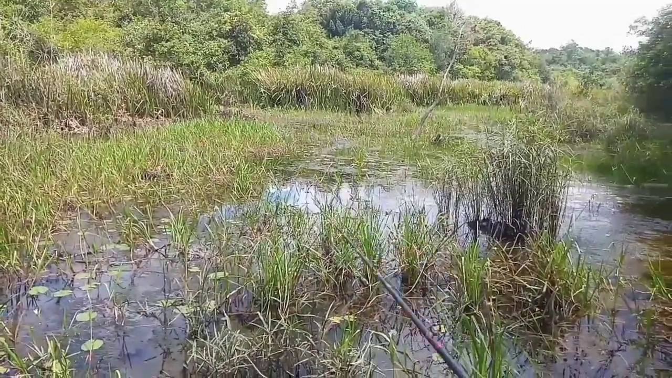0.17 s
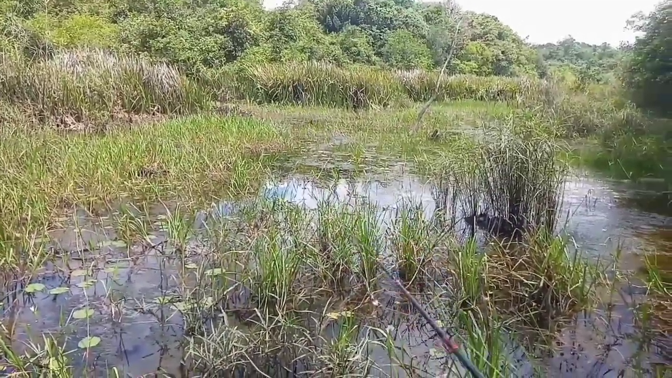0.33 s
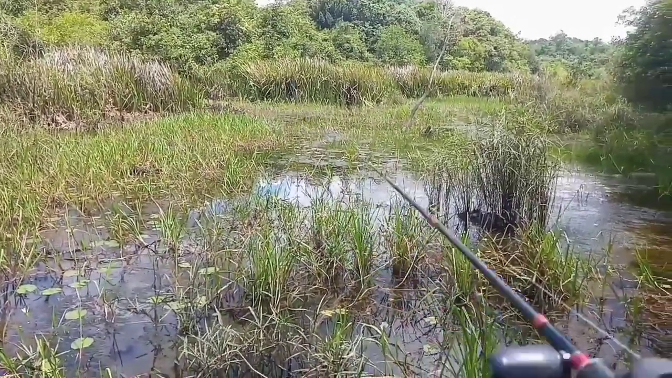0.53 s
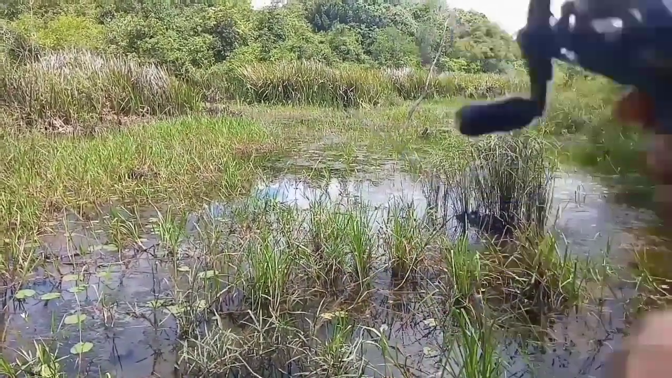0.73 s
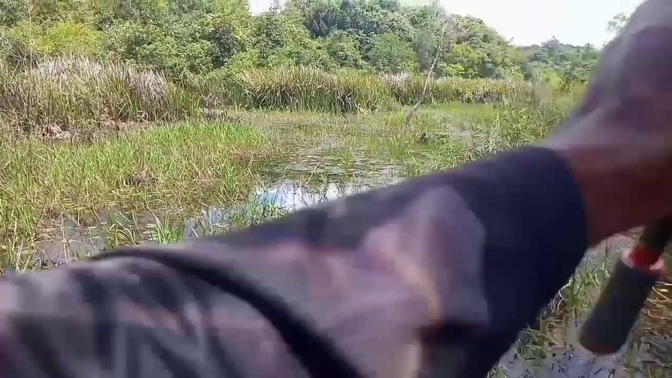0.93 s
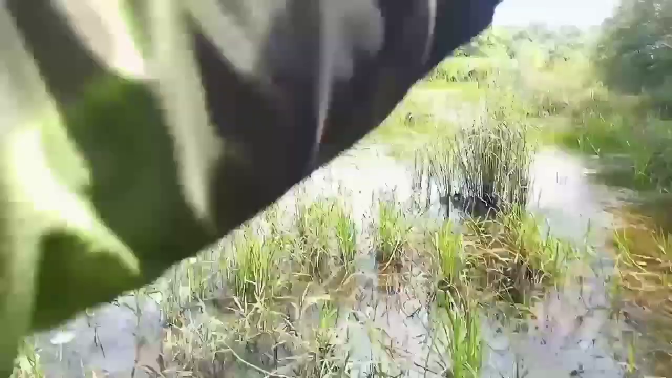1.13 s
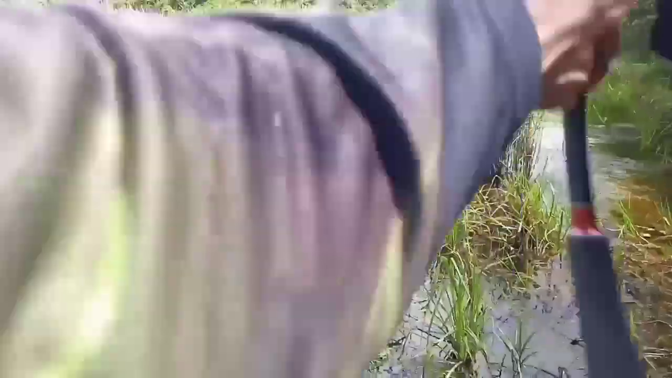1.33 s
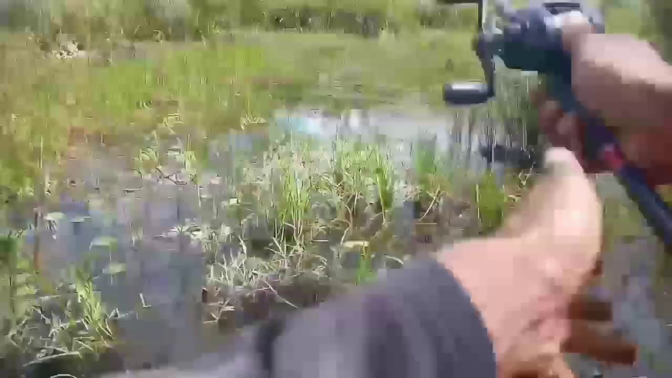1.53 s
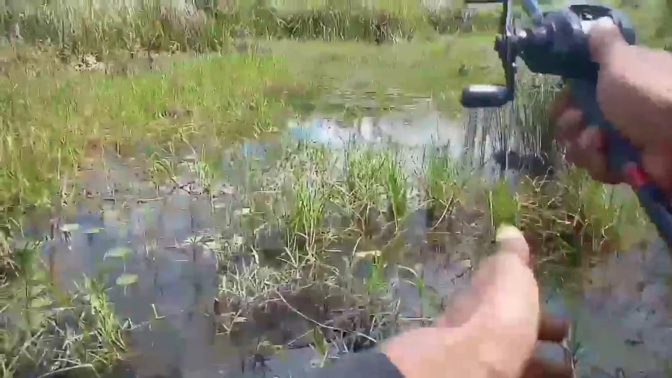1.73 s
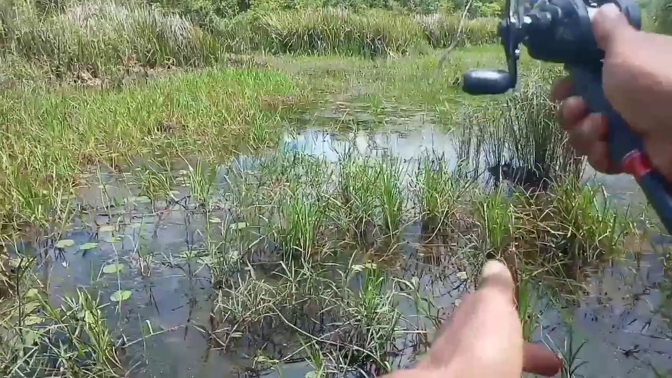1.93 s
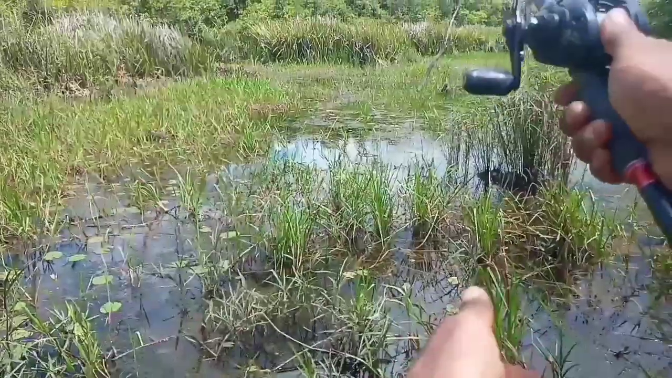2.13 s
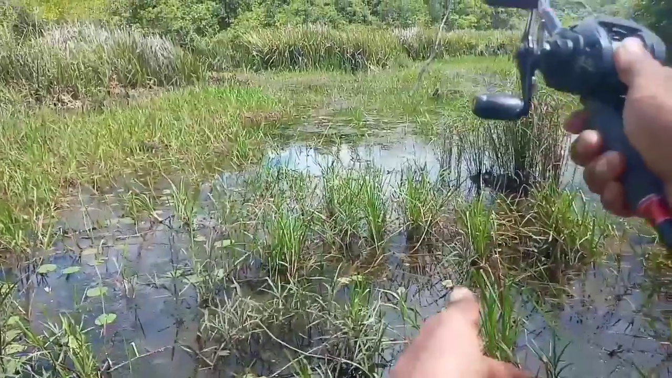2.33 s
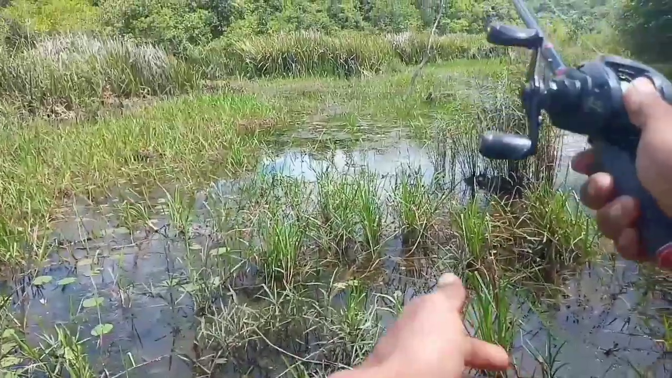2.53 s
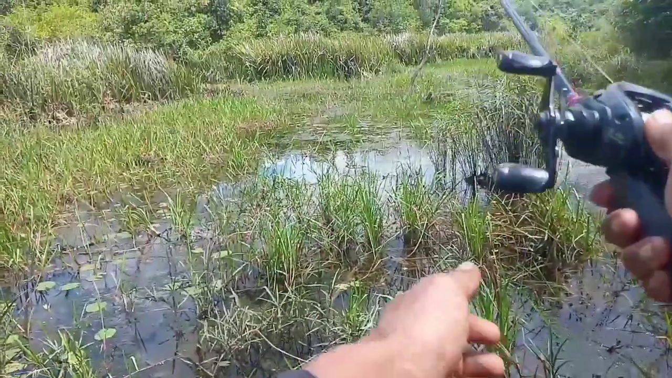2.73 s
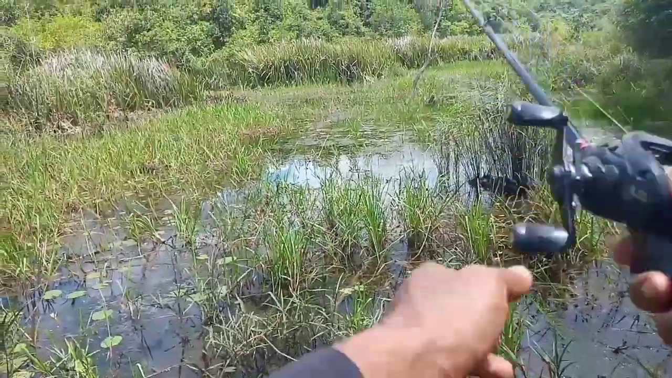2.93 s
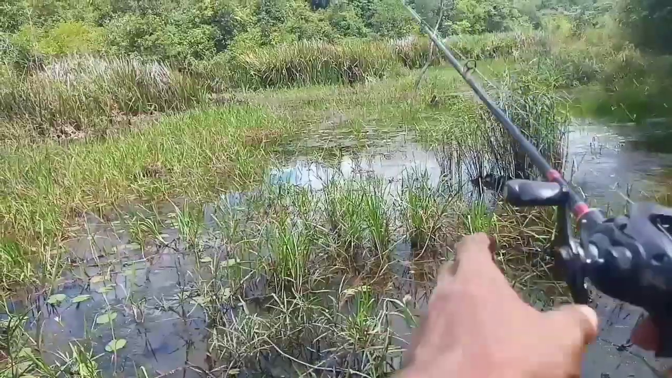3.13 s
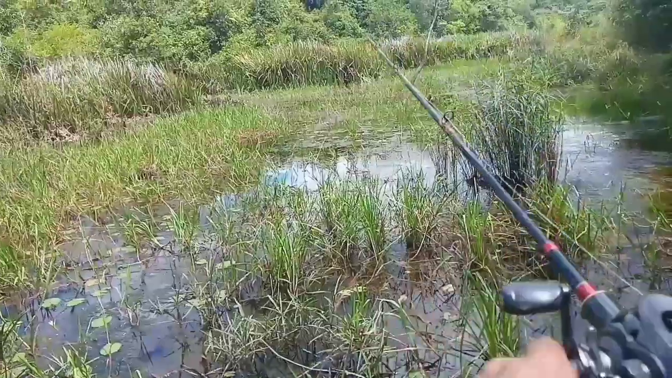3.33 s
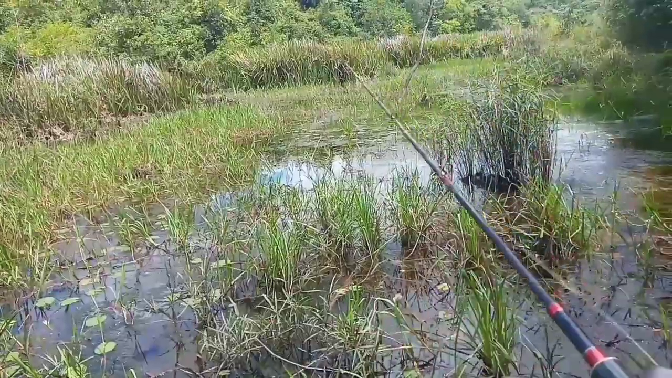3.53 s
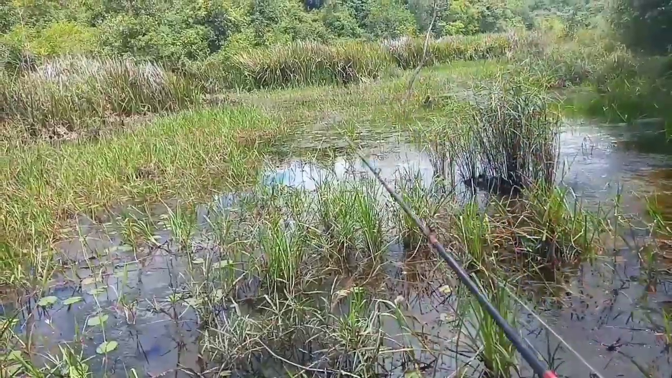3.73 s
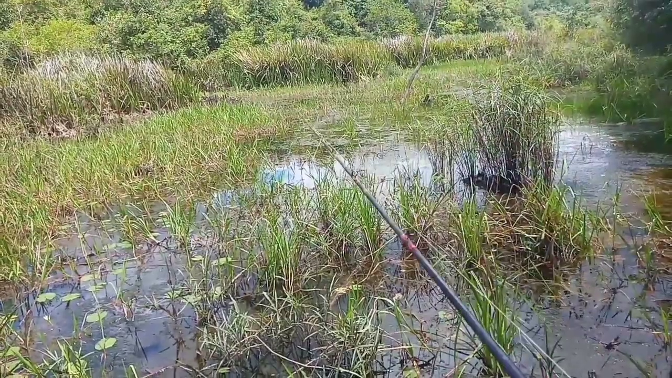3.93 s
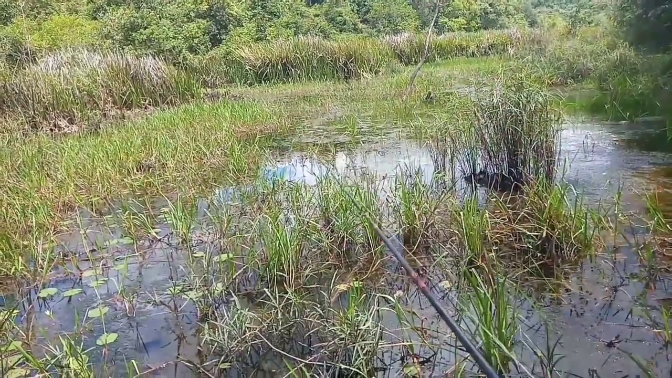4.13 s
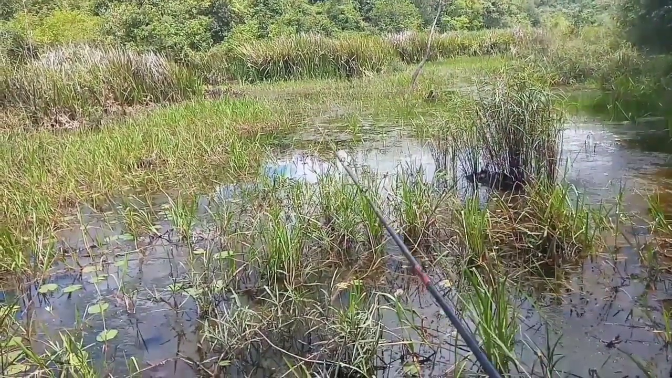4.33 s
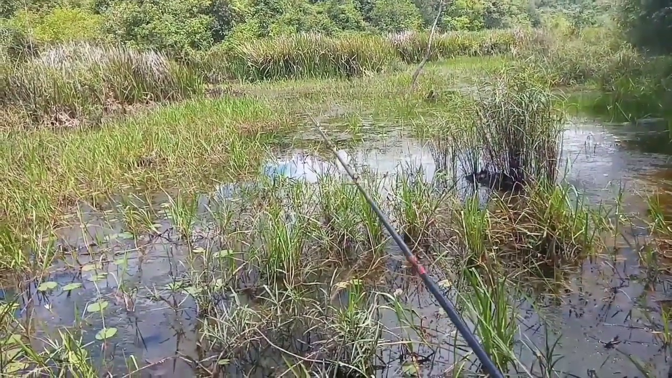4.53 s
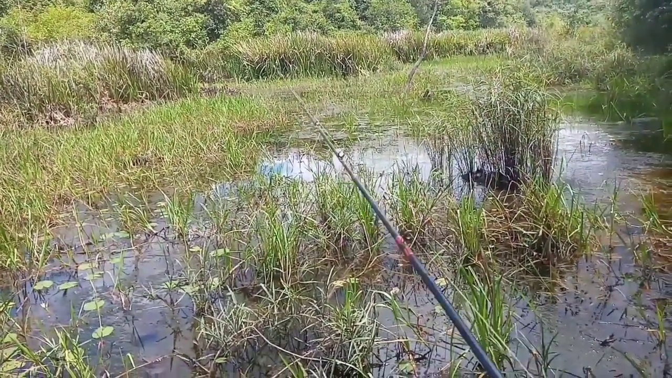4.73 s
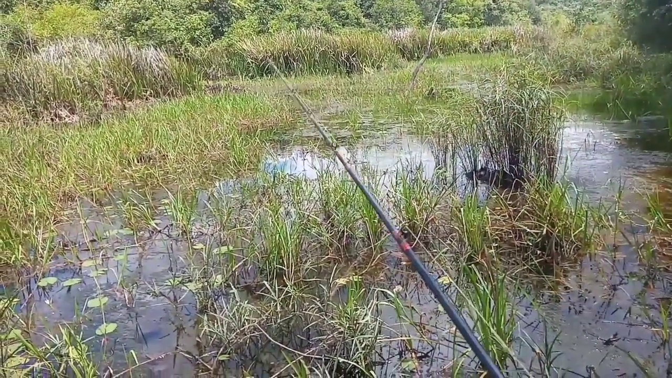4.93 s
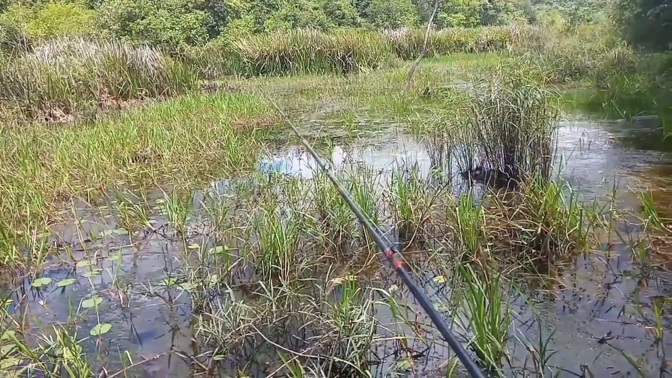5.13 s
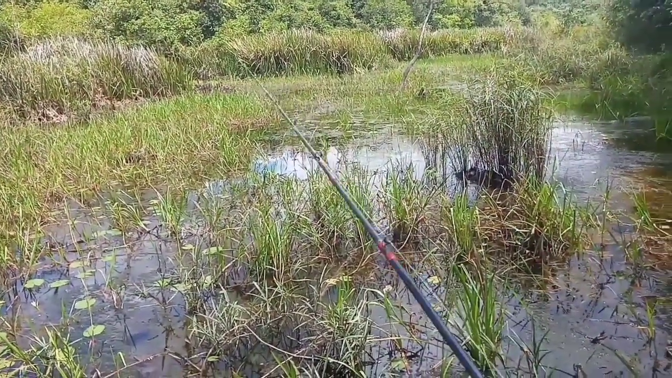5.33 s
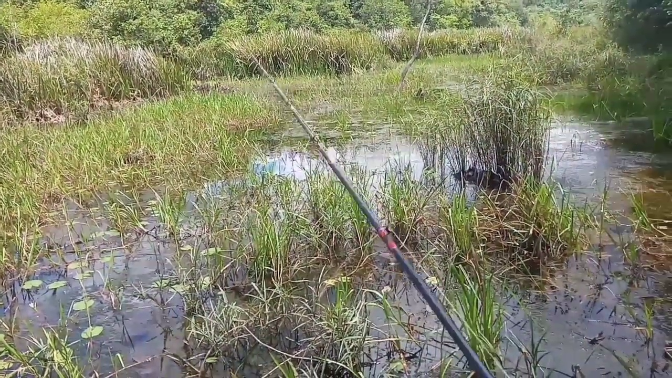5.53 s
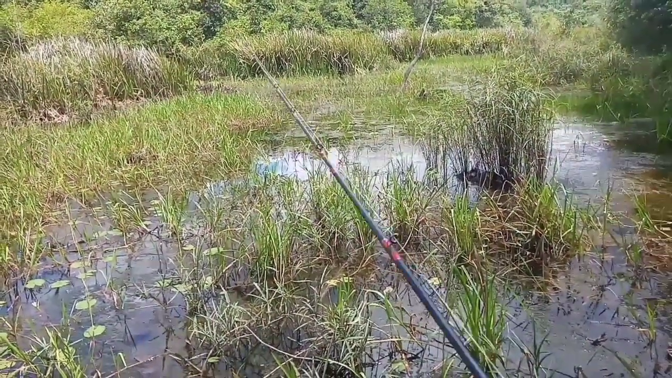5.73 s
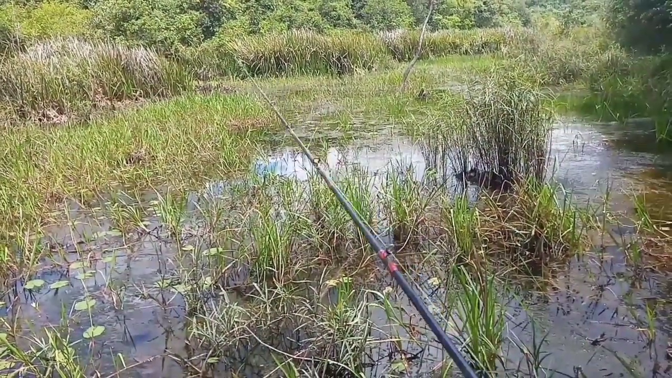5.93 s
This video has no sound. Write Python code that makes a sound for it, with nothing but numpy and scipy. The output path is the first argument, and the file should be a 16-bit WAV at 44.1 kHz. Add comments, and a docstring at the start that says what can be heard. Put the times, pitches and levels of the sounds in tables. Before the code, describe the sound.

Hard metallic click, sleeve rustle, fast whipping cast, a falling spool whir stopped by a thumb, then a bright double-edged clack and faint gear ticks outdoors.

```python
"""A clutch snaps open, a rod swishes, and a casting reel's free spool whirs and slows until a thumb stops it.
The handle then snaps the clutch shut and winds in with faint gear ticks. Sleeves rustle, wind breathes
on the microphone, and insects sing far off at the edge of a marsh. Knocks ring metal modes, the spool adds
multiples of its turning rate to shaped noise, and cloth, air and wind are shaped noise. Small drifts vary them."""
import sys
import numpy as np
from scipy import signal
from scipy.fft import rfft, irfft, next_fast_len
from scipy.io import wavfile
from scipy.ndimage import uniform_filter1d

SR = 44100
rng = np.random.default_rng(int(sys.argv[2]) if len(sys.argv) > 2 else 0)


def store_wav(level_fs):
    """Save 16-bit WAV to argv[1]."""
    pcm = np.round(np.clip(np.atleast_2d(level_fs), -1, 1) * 32767)
    wavfile.write(sys.argv[1], SR, pcm.T.astype(np.int16))


N = 268569
T = np.arange(N) / SR   # time in seconds

# In all tables levels are relative, and a half length runs from the peak of a swell to 1/e of its height.
# Wind on the microphone. Each row: time in seconds, level in dB.
WIND_LEVEL = [(0.0, -80.5), (0.27, -79.5), (0.93, -72.5), (1.75, -69), (1.88, -74), (2.22, -77.5),
              (2.73, -78.5), (2.85, -69), (2.97, -78.5), (3.21, -75), (4.24, -77.5), (5.39, -75.5),
              (5.78, -80), (6.09, -73.5)]
# Tone of the wind. Each row: frequency in Hz, level in dB per Hz.
WIND_TONE = [(15, -46.5), (25, -15), (49, 3.5), (97, -2.5), (135, -2), (270, -12.5), (600, -19), (780, -42)]
# Tone of the still air. Each row: frequency in Hz, level in dB per Hz.
AIR_TONE = [(150, -37), (250, -5.5), (460, -6.5), (1380, -7.5), (3280, -7), (4490, -11.5), (5160, -31.5),
            (8400, -17), (10000, -23), (14900, -30), (15600, -32)]
AIR_DB = -75.5
CRICKETS_HZ, CRICKETS_WIDTH_HZ, CRICKETS_DB = 8400, 500, -91
# A far cicada. Each row: time in seconds, pulses per second.
CICADA_PULSES = [(4.45, 328.5), (5.1, 321), (5.5, 315.5), (6.09, 311)]
# The cicada's body picks out multiples of its pulse rate. Each row: frequency in Hz, level in dB.
CICADA_BODY = [(3400, -100), (3730, -71), (3900, -67), (4060, -68.5), (4150, -79), (4400, -77),
               (4600, -79.5), (5000, -84), (6000, -160)]
CICADA_SWELL_S = 0.1
SECOND_RATE, SECOND_DB = 1.085, -5   # a second cicada, faster and farther
# A low drone. Each row: time in seconds, pitch in Hz, level in dB.
DRONE = [(0, 320, -70), (.1, 343, -79.5), (.18, 312, -69), (.22, 315, -100)]

# Rustle of sleeves and hands. Each row: time in seconds, level in dB.
RUSTLE_LEVEL = [(0.0, -69), (0.352, -76.5), (0.46, -52), (0.592, -68.5), (0.708, -58.5), (0.786, -66.5),
                (0.95, -62), (1.19, -62.5), (1.33, -57), (1.44, -53), (3.0, -65), (3.14, -68),
                (3.246, -73.5), (3.536, -68.5), (3.62, -71), (3.72, -55), (3.91, -69.5), (4.15, -63.5),
                (4.4, -70), (4.62, -63.5), (4.82, -67.5), (4.92, -69.5), (5.01, -63), (5.19, -78),
                (5.31, -68), (5.58, -69.5), (5.9, -70.5), (6.09, -63.5)]
# Tone of the cloth. Each row: frequency in Hz, level in dB per Hz.
RUSTLE_TONE = [(710, -29), (1200, -14.5), (1660, -7), (2530, -4), (3300, 0), (4210, -7.5), (5450, -26),
               (7000, -29.5), (9100, -62)]
# Gear resonances. Each row: centre in Hz, width in Hz, level in dB.
GEARS = [(1167.4, 170, -8), (1390, 170, -5), (1610, 240, -2), (2900, 150, -4.5), (3300, 400, -3.5)]
GEARS_WAVER_DB = 3.8
MURMUR_DB = -12   # steady gear murmur against the rustle
# Short pushes make the gears murmur louder. Each row: peak in seconds, half length in seconds, level in dB.
PUSHES = [(0.016, 0.035, -62), (0.16, 0.06, -73.5), (1.262, 0.037, -60.5), (1.358, 0.061, -61),
          (3.187, 0.02, -68), (3.628, 0.05, -68), (3.734, 0.039, -67), (3.857, 0.024, -63),
          (4.15, 0.11, -69.5), (4.64, 0.033, -63), (4.833, 0.036, -64.5), (5.103, 0.047, -71),
          (5.304, 0.054, -66), (5.703, 0.066, -78.5)]
# Gear teeth ticking. Each row: time in seconds, level in dB.
TICK_LEVEL = [(0, -93), (3.6, -83), (4.5, -69.5), (5.0, -78.5), (6.09, -79.5)]
# Cloth and line brush past. Each row: peak in seconds, half length in seconds, lowest Hz, highest Hz, level in dB.
BRUSHES = [(0.694, 0.04, 6400, 15500, -83), (4.18, 0.029, 5300, 12000, -75.5),
           (2.934, 0.094, 3950, 4350, -66)]
# A thin whine as the handle turns. Each row: peak in seconds, half length in seconds, level in dB.
WHINES = [(.17, 0.11, -72), (3.601, .04, -74.5), (3.887, .055, -73.5)]
WHINE_HZ, WHINE_WIDTH_HZ = 1220, 52

# Rod and line cut the air. Each row: time in seconds, then the rush, low rush and high rush in dB.
SWISH = [(1.41, -57, -86, -72), (1.44, -42.5, -95, -77), (1.48, -30.5, -60, -55.5),
         (1.515, -24.5, -61, -50), (1.535, -32, -53, -67), (1.556, -57, -49, -92), (1.66, -45, -61.5, -81)]
# Tone of the main rush. Each row: frequency in Hz, level in dB per Hz.
RUSH_TONE = [(400, -18), (800, -12), (1200, -2.5), (2600, -0.5), (3600, -9), (4800, -21), (6000, -54.5)]
# Tone of the high rush. Each row: frequency in Hz, level in dB per Hz.
HIGH_RUSH_TONE = [(3500, -33), (5500, -4), (8300, 2), (9500, -9.5), (12000, -16), (15000, -12),
                  (16500, -19)]
# Rough whistles of the whipping line. Each row: peak in seconds, half length in seconds, pitch in Hz, level in dB.
WHISTLES = [(1.482, 0.0045, 2320, -26), (1.493, 0.0049, 2300, -43), (1.509, 0.003, 1450, -22),
            (1.518, 0.0042, 2820, -32), (1.519, 0.01, 1546, -25.5)]
WHISTLE_FLUTTER_DB, WHISTLE_RISE_S = 3, 0.0005

# The free spool slows. Each row: time in seconds, turns per second.
SPIN = [(1.56, 291), (1.68, 267.4), (1.85, 238.4), (2.18, 166), (2.31, 146.5), (2.63, 101), (3.0, 62)]
# How the frame passes the hum. Each row: frequency in Hz, level in dB.
FRAME = [(250, -33), (450, -11.5), (640, 4.5), (750, 2), (900, -2.5), (1150, -4), (1700, -0.5), (2550, -5),
         (3500, -4), (5000, -15)]
# Low resonances that the first three multiples sweep through. Each row: frequency in Hz, level in dB.
WOBBLE = [(140, -22), (164, -18), (185, -41), (235, -12), (290, -23), (370, -10.5), (450, -22),
          (490, -14.5), (550, -12.5), (730, -0.5), (805, -3), (840, -16)]
# Tone of the bearing noise. Each row: frequency in Hz, level in dB per Hz.
WHIR_TONE = [(910, -45.5), (1550, -8), (1710, -3.5), (2250, -3.5), (3910, -4), (6030, -28), (8160, -18.5),
             (9500, -28), (12400, -52)]
# Tone of the line's hiss. Each row: frequency in Hz, level in dB per Hz.
LINE_TONE = [(3240, -29), (5500, -37), (6070, -5.5), (8260, -14), (10000, -6.5), (13000, 2), (15000, 0),
             (15600, 6)]
# Line pays out in surges and once slackens. Each row: peak in seconds, half length in seconds,
# then the lift of hum, whir and hiss in dB.
SURGES = [(1.685, 0.028, 0, -0.5, 10), (1.766, 0.055, 4.5, 4, 10.5), (2.167, 0.057, 4.5, 2.5, 8),
          (2.33, 0.075, -4, -1, 0), (2.54, 0.086, -3, 2, 9.5), (2.862, 0.12, 9, 3, 7.5)]
# The thumb drags on the spool. Each row: time in seconds, resonance in Hz, level in dB.
BRAKE = [(2.79, 850, -90), (2.82, 695, -73), (2.865, 600, -60.5), (2.92, 480, -68), (2.98, 296, -74),
         (3.0, 280, -82)]
FREE_S, THUMB_S, STOP_S = 1.53, 2.612, 3.0   # spool let go, thumb feathers it, thumb stops it
HUM_DB, HUM_FALL_DB_PER_S, THUMB_DAMPS_DB = -47.5, 11, 44
WHIR_DB, WHIR_FALL_DB_PER_S, STOP_DB_PER_S = -46.5, 11, 76
HISS_DB, HISS_PAUSE_S, HISS_PAUSE_DB = -82.5, 0.16, 17   # the hiss pauses at the thumb's first touch
HUM_WAVERS_DB, HUM_FLUTTERS_DB, HUM_BLUR_RAD = 4.2, 2.5, 0.5   # each multiple on its own
ROUGH_FROM_S, ROUGH_DB = 2.226, 4   # slowing down, the spool runs unevenly and its multiples break up
WOBBLE_FADES_DB = 30   # the wobble dies once the spool runs unevenly

# Contacts in the reel's clutch and frame. Each row: time in seconds, peak in dB, strongest ring in Hz,
# fall-off in dB per octave, crack in dB, thud in dB, rise in milliseconds, share of the ring's length.
CONTACTS = [(0.4012, -11.5, 1060, 45.5, -65, -50.5, 3.3, 0.5),
            (0.402, -38, 3715, 24.5, -45.5, -45, 1.5, 0.92), (0.403, -42, 1680, 44.5, -49.5, -45, 2, 2),
            (0.4385, -37.5, 3400, 19.5, -45.5, -44.5, 1.5, 1.2),
            (0.445, -16.5, 3470, 13.5, -29, -37.5, 0.25, 0.48),
            (0.4466, -1.5, 3500, 1, -21, -16, 0.065, 0.39),
            (0.4479, -8.5, 1640, 14, -32.5, -20.5, 0.39, 0.45),
            (0.4506, -20, 2730, 50, -38.5, -36, 2.2, 1.1), (0.4563, -20, 1150, 8, -38, -22.5, 1.5, 0.86),
            (1.278, -21.5, 2900, 6, -27.5, -41, 0.087, 0.13), (2.581, -43, 3400, 13, -12, -45, .3, .7),
            (3.149, -35.5, 1480, 57, -40.5, -36, 1.03, 2.2), (3.159, -40.5, 1470, 45, -42, -42, 1.2, 3),
            (3.621, -41, 2950, 23, -35, -47, 2.2, 1.2), (3.6436, -18, 3000, 25, -22, -42, .8, .6),
            (3.645, -7, 2308, 4, -29.5, -43.5, .5, .35), (3.6619, -17, 3030, 35, -37.5, -48, 1.5, 1),
            (3.664, -15.5, 2000, 16.5, -41, -51.5, .6, .55), (3.671, -3, 2139, 23, -19.5, -36.5, .2, 1.1),
            (3.6721, 1, 3030, 40, -34, -28.5, 0.6, 1.2), (3.6745, -0.5, 2597, 10, -31, -28.5, 0.29, 0.48),
            (3.677, -21, 2960, 18.5, -31.5, -18, .9, 0.76), (3.681, -26, 1900, 44.5, -35.5, -31.5, 1.5, 3),
            (3.841, -32.5, 2990, 39, -27.5, -50.5, 0.52, 0.78),
            (4.0733, -42, 3100, 32, -37.5, -46.5, 1.1, .8), (4.128, -39.5, 3140, 40, -37, -35, 1.3, 0.81)]
# Ringing modes of the reel. Each row: frequency in Hz, level in dB, time to fall 60 dB in seconds.
REEL_MODES = [(1090, -24, 0.034), (1460, -9.5, 0.0088), (1679, -0.5, 0.016), (1880, -5.5, 0.023),
              (2160, -0.5, 0.009), (2625, -0.5, 0.019), (3090, 2.5, 0.011), (3400, -2, 0.016),
              (3900, -8, 0.0044)]
# Modes of small steel parts. Each row: frequency in Hz, level in dB, time to fall 60 dB in seconds.
STEEL_MODES = [(6150, -14, 0.002), (6870, -10, 0.012), (8100, -6, 0.0029)]
# Modes of the rod grip. Each row: frequency in Hz, level in dB, time to fall 60 dB in seconds.
GRIP_MODES = [(107.9, -19, 0.051), (200, -6, 0.02), (370, -7.5, 0.017), (610, 0.5, 0.0057),
              (795, 1, 0.0086), (940, -5.5, 0.02)]

# The sound cuts out briefly. The pair: start in seconds, end in seconds.
DROPOUT = (5.7955, 5.8298)
CUTOFF_HZ = 16700
TOP = 1.1   # loud peaks are rounded towards this height


def amp(db):
    """dB to gain."""
    return 10 ** (np.asarray(db) / 20)


def unit(x):
    """Scale to an rms (average strength) of 1."""
    return x / np.sqrt(np.mean(x ** 2) + 1e-20)


def curve(rows):
    """Columns of a table over time, then a gate that is open inside its span."""
    s, *columns = np.transpose(rows)
    inside = 1.0 * (T >= s[0]) * (T <= s[-1])
    gate = uniform_filter1d(inside, size=400, mode="nearest")
    return [np.interp(T, s, column) for column in columns] + [gate]


def at_hz(points, hz):
    """Read a spectrum on a log-frequency axis, at -80 dB outside its ends."""
    table_hz, table_db = np.transpose(points)
    return np.interp(np.log(hz + 1e-9), np.log(table_hz), table_db, left=-80, right=-80)


def drift(rate):
    """Random wandering with rms 1; a higher rate in Hz wanders faster."""
    r = np.exp(-80 * np.pi * rate / SR)   # worked out on every 40th sample
    slow = signal.lfilter([1], [1, -2 * r, r * r], rng.standard_normal(N // 40 + 2002))[2000:]
    return np.interp(np.arange(N) / 40, np.arange(len(slow)), unit(slow))


def step(s, width):
    """Straight rise from 0 to 1 that starts at s."""
    return np.clip((T - s) / width, 0, 1)


def bell(s, half):
    """A smooth swell of height 1."""
    return np.exp(-((T - s) / half) ** 2)


def colour(x, spectrum):
    """Shape a dense noise by a spectrum; rms 1."""
    size = next_fast_len(N)
    gain = amp(at_hz(spectrum, np.fft.rfftfreq(size, 1 / SR)))
    return unit(irfft(rfft(x, size) * gain, size)[:N])


def band(x, low_hz, high_hz):
    """Keep the sound between two frequencies."""
    return signal.sosfilt(signal.butter(2, [low_hz, high_hz], "band", fs=SR, output="sos"), x + 1e-18)


def ring(x, hz, t60):
    """A unit click sets ringing a sine that starts near height 1 and falls 60 dB in t60 seconds."""
    r, w = amp(-60 / (t60 * SR)), 2 * np.pi * hz / SR
    return signal.lfilter([0, np.sin(w)], [1, -2 * r * np.cos(w), r * r], x + 1e-18)


def grains(per_s, spread_db):
    """Random clicks of uneven size."""
    clicks = rng.random(N) < per_s / SR
    size_db = spread_db * np.minimum(rng.exponential(1, N), 4)
    return clicks * rng.choice([-1, 1], N) * amp(size_db)


def patchy(x, patch_db, from_hz=350, count=17):
    """Quarter-octave bands of a noise swell and sink on their own."""
    edges = from_hz * 2 ** (np.arange(count) / 4)
    out = x
    for low, high in zip(edges, edges[1:]):
        swell = amp(patch_db * drift(10.0) - patch_db)
        out = out + (swell - 1) * band(x, low, high)
    return out


def free_run():
    """Open from the release until the spool has stopped."""
    return step(FREE_S, 0.0099) - step(STOP_S + 0.072, 0.038)


def cicadas():
    """Two pulse trains at nearby rates, heard as the multiples that the body picks out."""
    pulses = curve(CICADA_PULSES)[0] * (1 + 0.001547 * drift(9.3))
    cycles = 2 * np.pi * np.cumsum(pulses) / SR
    out = np.zeros(N)
    for rate, db in [(1, 0), (SECOND_RATE, SECOND_DB)]:
        for k in range(11, 16):
            level_db = at_hz(CICADA_BODY, k * rate * pulses) + db - 5 + 4.5 * drift(12)
            out += amp(level_db) * np.sin(k * rate * cycles + 1.1 * drift(20))
    return step(CICADA_PULSES[0][0], CICADA_SWELL_S) * out


def marsh():
    """Shaped noise for wind, still air and crickets, with two cicadas and an unsteady low drone."""
    wind = amp(curve(WIND_LEVEL)[0] + 2.5 + 2.8 * drift(5.6)) * colour(rng.standard_normal(N), WIND_TONE)
    air = amp(AIR_DB) * patchy(colour(rng.standard_normal(N), AIR_TONE), patch_db=4.5)
    half = CRICKETS_WIDTH_HZ / 2
    crickets = unit(band(rng.standard_normal(N), CRICKETS_HZ - half, CRICKETS_HZ + half))
    crickets *= amp(CRICKETS_DB + 1.2 * drift(6.5))
    hz, drone_db, near = curve(DRONE)
    drone = np.sin(2 * np.pi * np.cumsum(hz * (1 + 0.058 * drift(34))) / SR)
    return wind + air + crickets + cicadas() + near * amp(drone_db + 4.5) * drone


def handling():
    """Cloth rustle, a murmur in gear resonances, a whine and clumps of short tooth ticks."""
    rustle_db, _ = curve(RUSTLE_LEVEL)
    busy = 1 - free_run()   # the hands rest while the spool runs free
    cloth = colour(rng.standard_normal(N) + 0.54 * grains(1500, 4.2), RUSTLE_TONE) * amp(0.89 * drift(14))
    cloth = patchy(cloth, patch_db=6.0, from_hz=840, count=12)

    murmur = amp(rustle_db + MURMUR_DB) + sum(amp(db) * bell(s, half) for s, half, db in PUSHES)
    gear = np.zeros(N)
    for hz, width, db in GEARS:
        hum = unit(band(rng.standard_normal(N), hz - width / 2, hz + width / 2))
        gear += amp(db + GEARS_WAVER_DB * drift(9)) * hum

    teeth = grains(250 * amp(4.2 * drift(5.5)), 2.4)
    tick = unit(ring(teeth, 2950, 0.02) - ring(teeth, 3350, 0.01))
    brushes = np.zeros(N)
    for s, half, low, high, db in BRUSHES:
        brushes += amp(db) * bell(s, half) * unit(band(rng.standard_normal(N), low, high))
    whine = unit(ring(rng.standard_normal(N), WHINE_HZ, 1.7 / WHINE_WIDTH_HZ))
    whine *= sum(amp(db) * bell(s, half) for s, half, db in WHINES)
    hands = busy * (amp(rustle_db - 4.0) * cloth + amp(-6.5) * murmur * gear)
    return hands + amp(curve(TICK_LEVEL)[0]) * tick + brushes + whine


def swish():
    """Eddies behind the rod make a broad rush; the whipping line whistles in short rough bursts."""
    rush_db, low_db, high_db, on = curve(SWISH)
    white = rng.standard_normal(N)
    rush = amp(rush_db - 8) * colour(white + 1.7 * grains(3600, 1.3), RUSH_TONE)
    low_rush = amp(low_db) * unit(band(white, 70, 720))
    high_rush = amp(high_db) * colour(white + 0.5 * grains(400, 9.0), HIGH_RUSH_TONE)
    out = on * (rush + low_rush + high_rush)
    for s, half, hz, db in WHISTLES:
        swell = np.where(T < s, bell(s, WHISTLE_RISE_S), bell(s, half))
        tone = np.sin(2 * np.pi * hz * T + 0.5 * drift(49))
        out += amp(db + WHISTLE_FLUTTER_DB * drift(180)) * swell * tone
    return out


def cast_levels():
    """Hum, whir and line hiss in dB: hum and whir sink with time; all surge with the line and yield to the thumb."""
    lift = sum(np.outer(lifts_db, bell(s, half)) for s, half, *lifts_db in SURGES)
    since = T - FREE_S
    stop = STOP_DB_PER_S * np.maximum(T - STOP_S, 0)
    pause = step(THUMB_S, 0.049) - step(THUMB_S + HISS_PAUSE_S, 0.044)
    hum = HUM_DB - HUM_FALL_DB_PER_S * since + lift[0] - THUMB_DAMPS_DB * step(THUMB_S - 0.03, 0.15)
    whir = WHIR_DB - WHIR_FALL_DB_PER_S * since + lift[1] - stop
    hiss = HISS_DB + lift[2] - HISS_PAUSE_DB * pause - 2 * stop
    return hum, whir, hiss


def spool_tones(turns, phase, hum_db, centre):
    """Multiples of the turning rate: a hum coloured by the frame, and a drag around the thumb's resonance."""
    part = slice(int(1.4 * SR), int(3.2 * SR))   # only while the spool is heard
    hum, drag = np.zeros(N), np.zeros(N)
    for k in range(1, 29):
        hz = k * turns[part]
        blur = min(k / 4, 1) * HUM_BLUR_RAD * drift(35) * (1 + step(ROUGH_FROM_S, 0.22))
        wave = np.sin(k * phase[part] + rng.uniform(0, 2 * np.pi) + blur[part])
        rough_db = ROUGH_DB * step(ROUGH_FROM_S, 0.44) * (drift(25) - 0.5)
        waver_db = HUM_WAVERS_DB * drift(8.5) + HUM_FLUTTERS_DB * drift(30) + rough_db
        waver = amp(waver_db[part] - 0.17 * max(k - 14, 0))   # high multiples are weaker
        if k < 4:
            wobble_db = (hum_db - WOBBLE_FADES_DB * step(ROUGH_FROM_S, 0.097))[part]
            level = waver ** 0.83 * amp(wobble_db + 1.0 + at_hz(WOBBLE, hz))
        else:
            level = waver * amp(hum_db[part] - 8.0 + at_hz(FRAME, hz))
        hum[part] += wave * level
        drag[part] += wave * waver ** 0.8 * amp(-35 * np.log2(hz / centre[part]) ** 2)
    return hum, drag


def spool():
    """A wobble and one bump a turn make multiples; the bearing noise throbs with the turn until the thumb."""
    turns, _ = curve(SPIN)
    hum_db, whir_db, line_db = cast_levels()
    centre, brake_db, thumb = curve(BRAKE)
    phase = 2 * np.pi * np.cumsum(turns * (1 + 0.00591 * drift(25.8))) / SR
    hum, drag = spool_tones(turns, phase, hum_db, centre)

    throb = 1 + 0.5 * np.cos(phase) * (T < THUMB_S)
    each_turn = np.diff(phase // (2 * np.pi), prepend=0)
    bumps = unit(each_turn * amp(1.5 * drift(60)))
    bumps *= 1 - step(ROUGH_FROM_S, THUMB_S - ROUGH_FROM_S)   # they fade as the spool runs unevenly
    whir = colour(throb * rng.standard_normal(N) + 2.5 * grains(2300, 3.0) + bumps, WHIR_TONE)
    whir *= amp(0.55 * drift(21))
    rumble = unit(band(throb * rng.standard_normal(N), 630, 2700))
    line = colour(throb * rng.standard_normal(N) + bumps, LINE_TONE)
    line = unit(patchy(line, patch_db=5, from_hz=5000, count=7))
    noise = amp(whir_db - 1.5) * whir + amp(hum_db - 9.0) * rumble + amp(line_db + 1.0) * line
    return free_run() * (hum + noise) + thumb * amp(brake_db - 5.5) * drag


def strike(s, db, pitch_hz, fall_db, rise_ms, share, chance):
    """One contact: every mode swells over the rise time and dies; those nearest its pitch are favoured."""
    hz, gain_db, t60 = np.transpose(REEL_MODES)[:, :, None]
    t = np.arange(int(0.06 * SR)) / SR
    swell = np.sin(np.pi / 2 * np.clip(1000 * t / max(rise_ms, 0.02), 0, 1)) ** 2
    start_db = db + gain_db - 8.0 - fall_db * abs(np.log2(hz / pitch_hz)) + chance[:, None]
    level_db = start_db - 60 * np.maximum(t - rise_ms / 1000, 0) / (t60 * share)
    out, at = np.zeros(N), round(s * SR)
    out[at:at + len(t)] = swell * np.sum(amp(level_db) * np.sin(2 * np.pi * hz * t), axis=0)
    return out


def contacts():
    """Each contact rings the reel's modes, with a crack, a thud in the grip and a short scatter."""
    s, db, pitch, fall, crack_db, thud_db, rise, share = np.transpose(CONTACTS)
    at = np.round(s * SR).astype(int)
    chance = rng.normal(0, 1.2, (len(s), len(REEL_MODES)))   # dB for each mode of each contact

    def train(level_db):
        """One click per contact."""
        return np.bincount(at, amp(level_db), N)

    rings = sum(strike(*row) for row in zip(s, db, pitch, fall, rise, share, chance))
    # a blunt contact: little above or below the modes
    rings = signal.sosfilt(signal.butter(5, [1060, 4800], "band", fs=SR, output="sos"), rings)
    decay = amp(-60 / (0.0082 * SR))
    burst = signal.lfilter([1], [1, -decay], train(db + crack_db - 4.5) + 1e-18)
    crack = band(burst * rng.standard_normal(N), 6000, 15000)
    crack += sum(ring(train(db + crack_db + gain_db), hz, t60) for hz, gain_db, t60 in STEEL_MODES)
    thud = sum(ring(train(db + thud_db + gain_db), hz, t60) for hz, gain_db, t60 in GRIP_MODES)

    # two decays of power: off the angler, then off the reeds
    near = ring(train(db), SR / 4, 0.04) ** 2
    far = ring(train(db), SR / 4, 0.15) ** 2
    tail = np.sqrt(abs(uniform_filter1d(amp(-60.0) * near + amp(-86.0) * far, size=8)))
    scatter = band(band(rng.standard_normal(N), 900, 4600), 1400, 4200)
    scatter += amp(-25.0) * band(rng.standard_normal(N), 5000, 13000)
    scatter = unit(patchy(scatter, patch_db=5.0, from_hz=930, count=11))
    return rings + crack + band(thud, 150, 940) + tail * scatter


def scene():
    """All sources add up at one microphone."""
    return (marsh() + handling() + swish() + spool() + contacts())[None]


def record(dry):
    """The small microphone drops the deep bass; loud peaks are rounded; a brief dropout; the top is cut."""
    thin = signal.sosfilt(signal.butter(2, 70, "high", fs=SR, output="sos"), dry)
    gain = np.where((T > DROPOUT[0]) & (T < DROPOUT[1]), amp(-29.5), 1)
    rounded = TOP * np.tanh(thin * gain / TOP)
    return signal.sosfilt(signal.cheby2(14, 50, CUTOFF_HZ, fs=SR, output="sos"), rounded)


dry = scene()
out = record(dry)
store_wav(out)
```